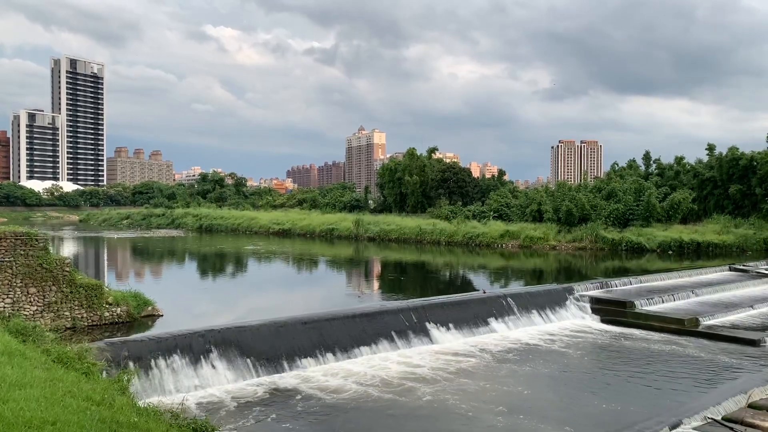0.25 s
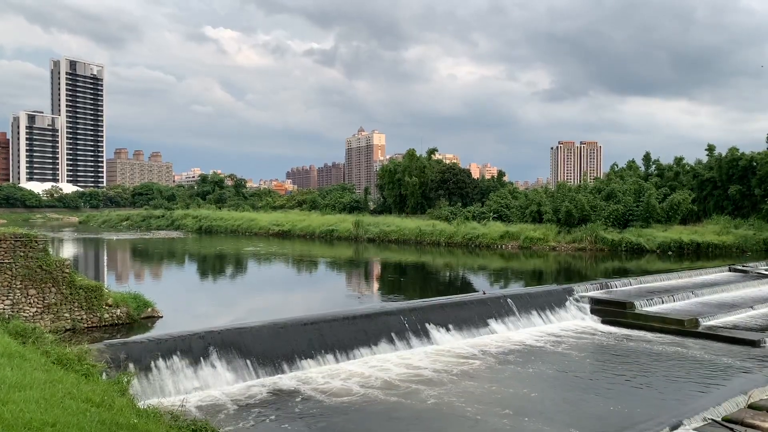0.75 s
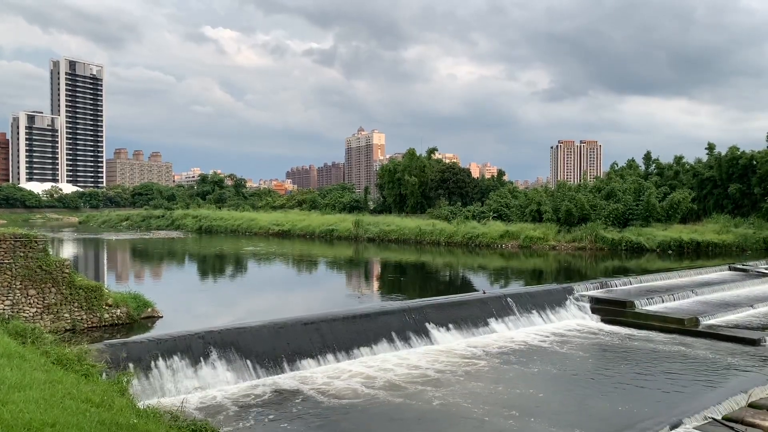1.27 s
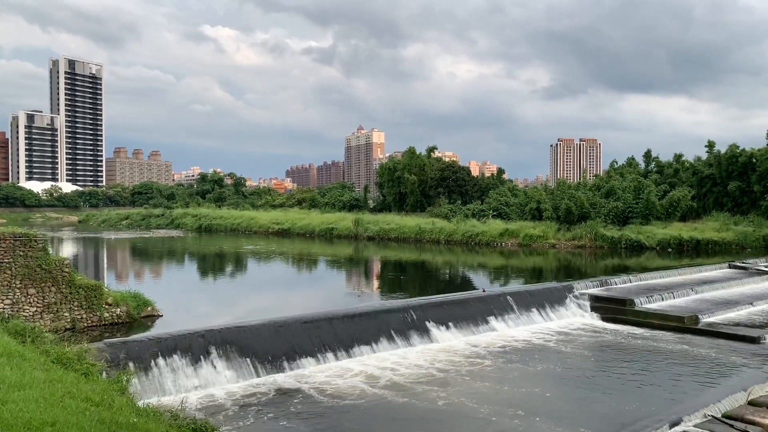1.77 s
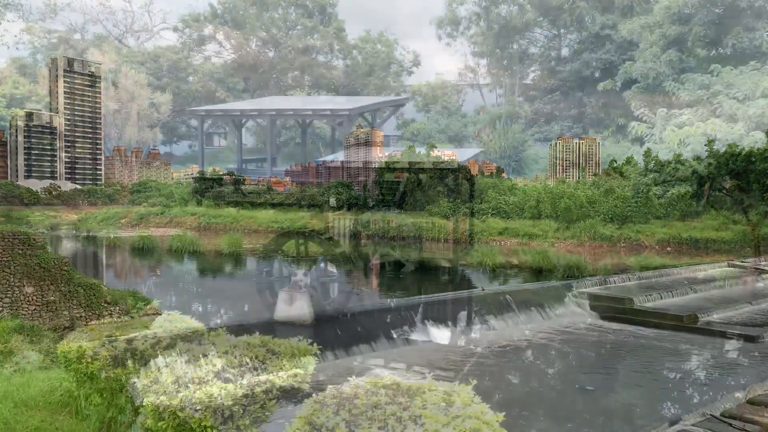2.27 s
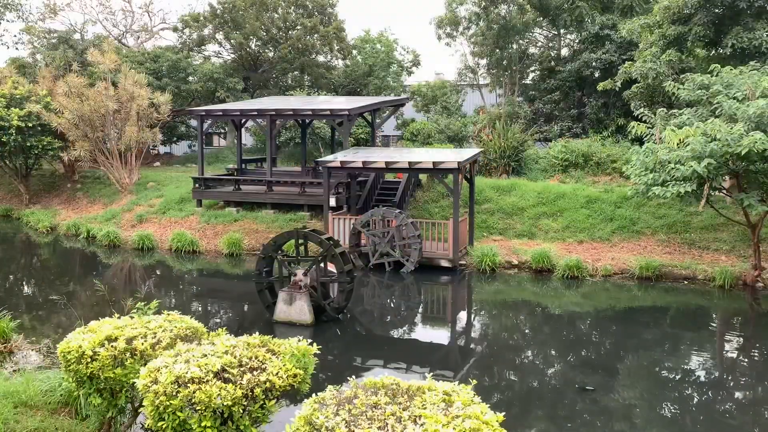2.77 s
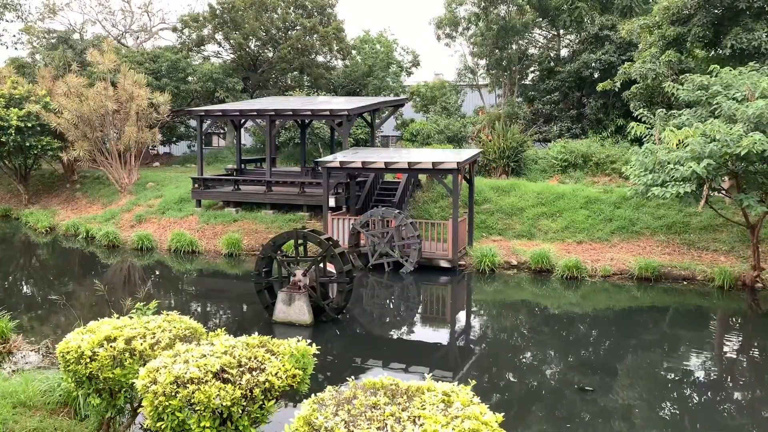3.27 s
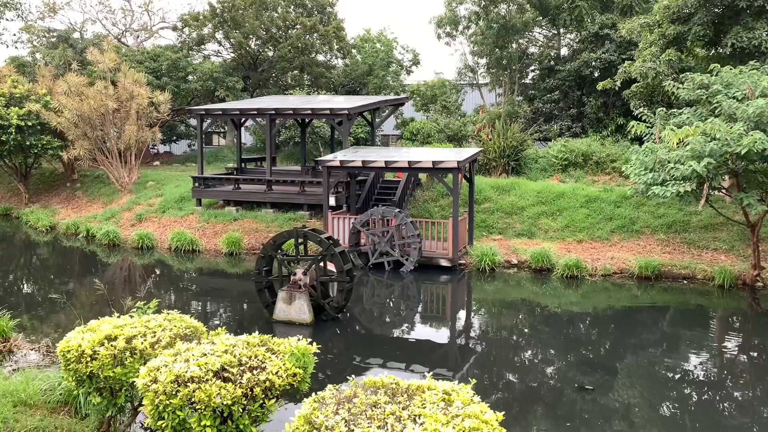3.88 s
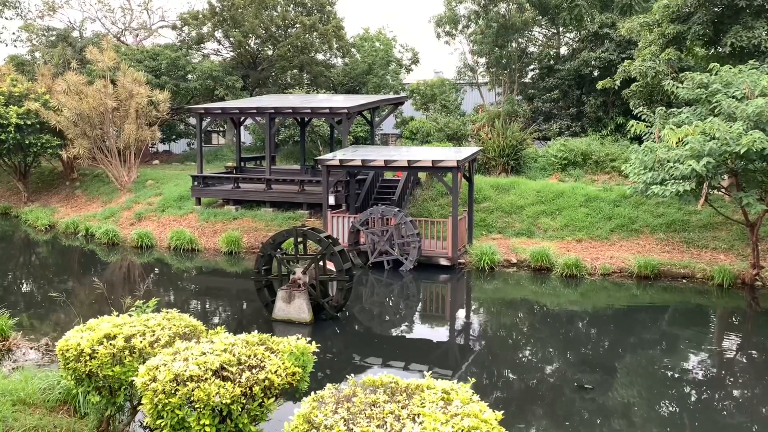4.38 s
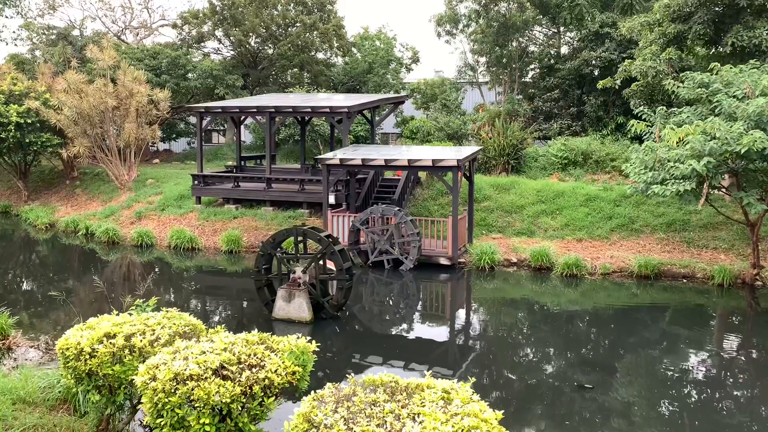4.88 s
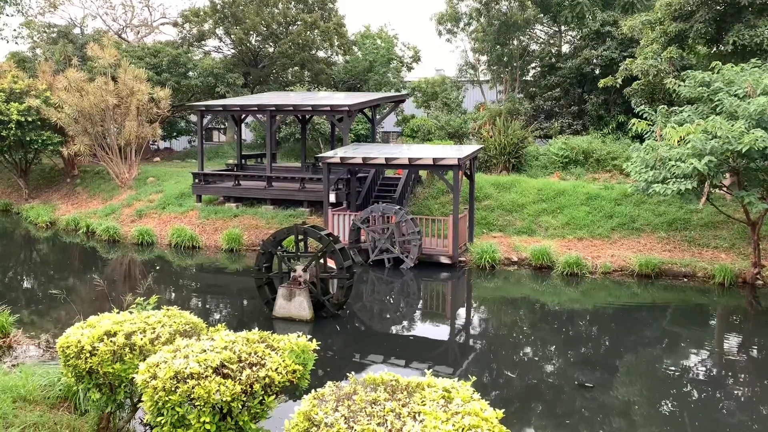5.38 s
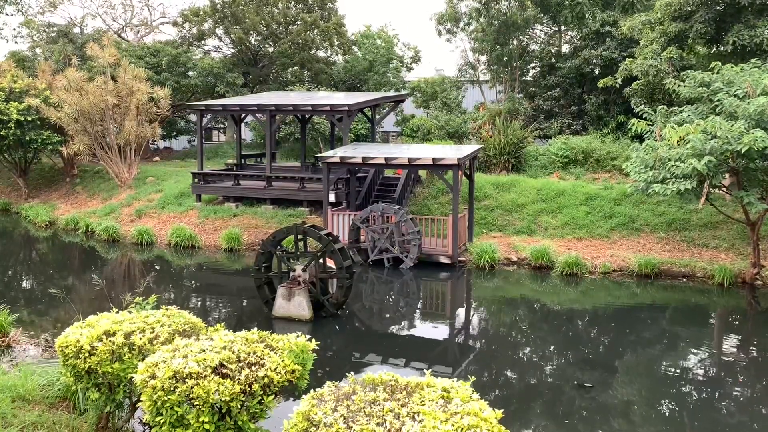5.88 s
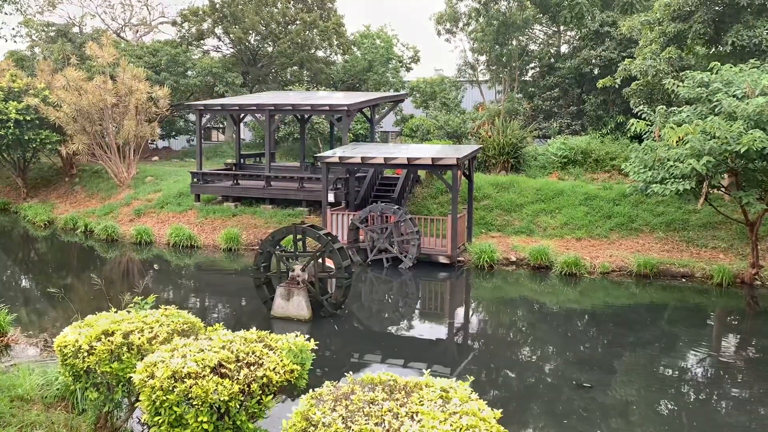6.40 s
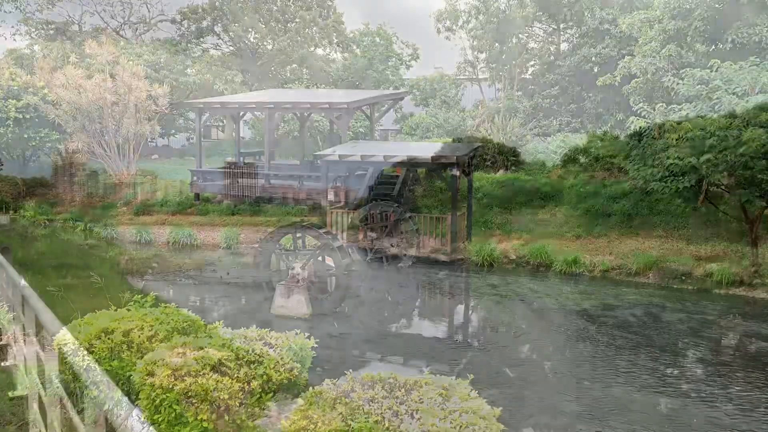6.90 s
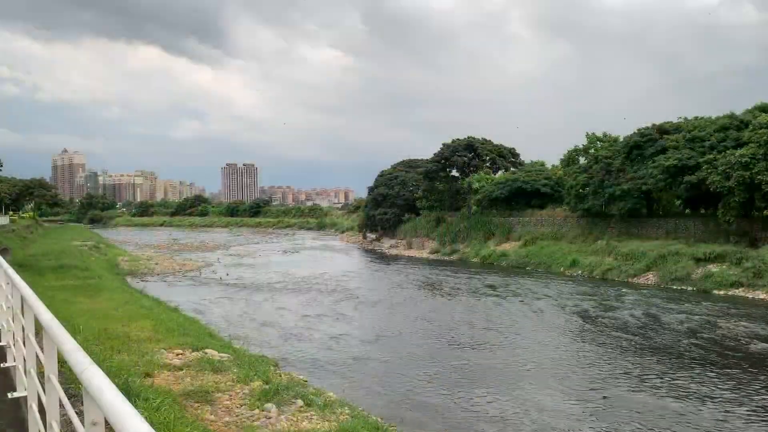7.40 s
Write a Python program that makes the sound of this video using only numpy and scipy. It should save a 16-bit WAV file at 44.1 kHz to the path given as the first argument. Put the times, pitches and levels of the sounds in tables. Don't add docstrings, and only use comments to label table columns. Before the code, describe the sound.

Loud rushing falls of water fade to a hushed pond of faint insects and small bird calls, then distant traffic rumble and a bubbling bird.

```python
import sys
import numpy as np
from scipy import signal
from scipy.io import wavfile
from scipy.ndimage import uniform_filter1d

SR = 44100
rng = np.random.default_rng(int(sys.argv[2]) if len(sys.argv) > 2 else 0)


def output_pcm(signal):
    pcm = np.clip(np.atleast_2d(signal).T, -1, 1) * 32767
    wavfile.write(sys.argv[1], SR, np.round(pcm).astype(np.int16))


def decibels_to_gain(level_db):
    exponent = np.asarray(level_db, float) / 20
    return 10 ** exponent


N = 337365
FRAMES = -(-N // 256) + 1
GRID = 858


def columns(rows, at):
    first, *rest = np.transpose(rows)
    return [np.interp(at, first, c) for c in rest]


def add(mix, start_s, sound):
    part = mix[:, round(start_s * SR):][:, :sound.shape[1]]
    part += sound[:, :part.shape[1]]


def smooth(x, *spans):
    for axis, span in enumerate(spans):
        x = uniform_filter1d(x, max(int(span), 1), axis)
    return x / np.sqrt(np.mean(x ** 2) + 1e-20)


# f/Hz, share of forward sound [0-1], right leads by [radians]
PORT_PATH = [(6500, 0, 0), (7800, 1, 2.1), (8550, 1, 3.14), (11000, 1, 6.28), (13400, 1, 9.42),
             (15700, 1, 12.57)]


def at_ports(z, other, side, aside=0.28, off_axis=0.):
    hz = np.fft.rfftfreq(1024, 1 / SR)
    same, lead, pan_db = columns(side, hz)
    forward, path = columns(PORT_PATH, hz)
    path = path + off_axis * forward
    forward_same = 1 - aside * np.sin(path) ** 2
    same = np.clip(same + forward * (forward_same - same), 0, 1)[:, None]
    wrapped_lead = np.angle(np.exp(1j * lead))
    phase = np.where(forward > 0, path + (1 - forward) * wrapped_lead, lead)
    turn = np.exp(1j * phase)[:, None]
    tilt = decibels_to_gain(pan_db * (1 - forward) / 2)[:, None]
    left = z * tilt
    right = (same * z + np.sqrt(1 - same ** 2) * other) * turn / tilt
    pair = np.array([left, right])
    return pair / np.sqrt((abs(pair) ** 2).sum(axis=1).mean() / 3)


def air(spectrum, side, level_db, patchy_db, swell_db):
    hz = np.fft.rfftfreq(1024, 1 / SR)
    a, b, c, d, patches = rng.standard_normal((FRAMES, 513, 5), dtype="f4").T
    swell = smooth(rng.standard_normal(FRAMES), 30) * np.exp(-hz / 400)[:, None]
    f, db = np.transpose(spectrum)
    colour = np.interp(np.log(hz + 1), np.log(f), db) - 60 * (hz < 20)
    colour -= 6 * np.maximum(hz - 14500, 0) / 1000
    gain = decibels_to_gain(colour[:, None] + patchy_db * smooth(patches, 12, 14) + swell_db * swell)
    return decibels_to_gain(level_db) * at_ports(gain * (a + 1j * b), gain * (c + 1j * d), side)


# f/Hz, left-right likeness [0-1], right leads by [radians], left-right level/dB
WEIR_PLACE = [(100, .985, .1, 0), (300, .97, .2, 0), (500, .62, .2, -1), (750, .65, .4, -4.5),
              (1250, .7, .3, -1.5), (2000, .45, 0, -.5), (2600, .1, 0, -.5), (3300, .35, 1.2, -.5),
              (4000, .12, -.5, -1), (5000, .45, -3, -2), (5700, .15, -4.3, -2), (6500, .68, -6, -1)]
# f/Hz, level/dB
WEIR_COLOUR = [(25, -42), (50, 1), (100, -0.2), (220, 0.0), (330, -4), (450, -8.5), (750, -7), (1300, -10),
               (3000, -13.5), (4200, -17.5), (5500, -20), (8000, -19), (11000, -18.5), (14300, -21.4)]


def weir():
    return air(WEIR_COLOUR, WEIR_PLACE, -26.5, patchy_db=1.06, swell_db=0.1)


# f/Hz, left-right likeness [0-1], right leads by [radians], left-right level/dB
POND_PLACE = [(100, .96, .2, 0), (300, .85, .3, 0), (480, .3, .3, 0), (800, .62, -1.9, 0),
              (1500, .38, -2.6, 0), (2300, .4, -3.1, 0), (3700, .1, -4, 0), (4500, .25, -4, 0),
              (6500, .05, -6, 0)]


def insects(hz, width, rate, level_db, crowd, off_axis):
    drift = smooth(rng.standard_normal(N), 6100)
    turns = np.cumsum(rate * (1 + 0.0302 * drift)) / SR
    buzz = crowd + (1 - crowd) * 2 * np.cos(np.pi * turns) ** 4
    clicks = buzz * rng.standard_normal((2, N), dtype="f4")
    f, _, z = signal.stft(clicks, SR, nperseg=1024, noverlap=768)
    skirt = np.where(f > hz, .48, 1)
    z = z * np.exp(-2 * ((f - hz) / width / skirt) ** 2)[:, None]
    return decibels_to_gain(level_db) / 2 * at_ports(z[0], z[1], POND_PLACE, aside=0.046, off_axis=off_axis)


# f/Hz, level/dB
POND_COLOUR = [(25, -10.5), (50, 2.5), (90, -0.2), (200, -6), (330, -10), (480, -16.5), (1000, -16.5),
               (2000, -23), (3500, -28), (5500, -33.5), (7500, -44), (9000, -46), (12600, -53),
               (13800, -56)]
# f/Hz, width [Hz], buzzes a second [1/s], level/dB,
# share of singers out of step [0-1], off the axis by [radians]
NEAR_CICADA = (10801, 1900, 133, -54, 0.76, 0.13)
TOP_CICADA = (13900, 900, 131, -83, .9, -2)


def pond():
    still = air(POND_COLOUR, POND_PLACE, -41.5, patchy_db=1.13, swell_db=0.5)
    return still + insects(*NEAR_CICADA) + insects(*TOP_CICADA)


# f/Hz, left-right likeness [0-1], right leads by [radians], left-right level/dB
BANK_PLACE = [(100, .95, 0, 0), (500, .75, -.6, 0), (1000, .55, -.9, 0), (1700, .3, 0, 0), (6500, .4, 0, 0)]
# f/Hz, level/dB
BANK_COLOUR = [(25, -12), (50, 2), (90, -4.5), (200, -10.5), (350, -11.5), (600, -18.5), (1100, -22.5),
               (1800, -27.5), (4200, -38), (5500, -47.5), (7300, -52), (9500, -49), (12300, -53),
               (13800, -58.5)]
# f/Hz, width [Hz], buzzes a second [1/s], level/dB,
# share of singers out of step [0-1, above 1 inverts the beat], off the axis by [radians]
THIN_KATYDID = (8550, 500, 111, -71, 4, 0)
DISTANT_CICADA = (10501, 1000, 120.5, -70, 1, -.3)


def bank():
    traffic = air(BANK_COLOUR, BANK_PLACE, -41, patchy_db=1.0, swell_db=1.0)
    return traffic + insects(*THIN_KATYDID) + insects(*DISTANT_CICADA)


# start t/s, length t/s
PLACE_CHANGES = [
    (1.854, 0.97),
    (6.3, 0.95),
]


def backdrops():
    t = np.arange(FRAMES) * 256 / SR
    first, second = (np.clip((t - s) / length, 0, 1) for s, length in PLACE_CHANGES)
    z = (1 - first) * weir()
    z += (first - second) * pond()
    z += second * bank()
    return signal.istft(z, nperseg=1024, noverlap=768)[1][:, :N]


def trees(x, wet_db, t60):
    t = np.arange(SR // 2) / SR
    signs = rng.choice([-1., 1.], (2, len(t)))
    hits = rng.random((2, len(t))) < .05
    taps = signs * hits * decibels_to_gain(-60 * t / t60) * (t > .012)
    taps = taps / np.linalg.norm(taps[0])
    return x + decibels_to_gain(wet_db) * signal.fftconvolve(x, taps, axes=1)[:, :N]


def voice(hz, level_db, rough, pan_db, lead, partials=((1, 0),)):
    flutter = [smooth(smooth(v, 48), 48) for v in rng.standard_normal((2, len(hz)))]
    rough_hz = hz + 430 * rough ** 2 * flutter[0]
    turn = 2 * np.pi * np.cumsum(rough_hz) / SR + lead * np.arange(2)[:, None]
    tone = sum(decibels_to_gain(db) * np.sin(k * turn) for k, db in partials)
    gain = np.sqrt(2) * decibels_to_gain(level_db + np.array([[pan_db], [-pan_db]]) / 2)
    return gain * (1 - rough / 2 + rough * flutter[1]) * tone


def notes(rows, pan_db, lead, rough, glide=0., skew=.69, partials=((1, 0),)):
    out = np.zeros((2, N))
    for s, length, first_hz, *last_hz, db in rows:
        u = np.arange(0, length, 1 / SR) / length
        rise_hz = last_hz[0] - first_hz if last_hz else glide * first_hz
        note = voice(first_hz + rise_hz * u, db, rough, pan_db, lead, partials)
        add(out, s, note * np.sin(np.pi * u ** skew) ** 0.35)
    return out


# t/s after its start, f/Hz, level/dB
PHRASE = [
    (0, 5900, -14),
    (.025, 4650, -2),
    (.048, 5250, -4),
    (.075, 4250, 2),
    (.1, 3960, -2),
    (.118, 4900, -1),
    (.15, 4700, -4),
    (.18, 5000, -5),
    (.235, 4250, -6),
]
# t/s, level/dB, right leads by [radians]
PHRASE_AT = [
    (4.47, -62.5, 1.5),
    (5.9, -61, 1.7),
]


def warbler():
    t = np.arange(0, PHRASE[-1][0], 1 / SR)
    hz, db = columns(PHRASE, t)
    hz = uniform_filter1d(hz, 200)
    out = np.zeros((2, N))
    for s, sung_db, lead in PHRASE_AT:
        add(out, s, voice(hz, db + sung_db, .1, 1, lead) * signal.windows.tukey(len(t), .1))
    return out


# t/s, peak level/dB
SPARROW_CHIRPS = [
    (3.18, -52),
    (3.998, -52.5),
    (4.81, -52.5),
    (5.635, -53.5),
    (6.395, -55),
]
# t/s, top f/Hz, peak level/dB
SPARROW_CHIPS = [
    (3.83, 3900, -63),
    (4.12, 3700, -59),
    (4.97, 5900, -64),
    (5.11, 5100, -59),
    (5.26, 5200, -58),
    (5.37, 3900, -60),
    (6.35, 4600, -59),
    (6.478, 4200, -61),
]
# t/s, peak level/dB
SPARROW_CHURRS = [
    (6.39, -57),
    (6.44, -55),
    (6.53, -59),
]


def sparrows():
    cores = [(s, .045, 4310, db) for s, db in SPARROW_CHIRPS]
    tips = [(s, .02, 5150, db - 8) for s, db in SPARROW_CHIRPS]
    chips = [(s, .03, hz, db) for s, hz, db in SPARROW_CHIPS]
    churrs = [(s, .038, 2700, db) for s, db in SPARROW_CHURRS]
    out = notes(cores, -4, 1.3, rough=.66, glide=-0.0504)
    out += notes(tips, -6, 1.4, rough=.4, glide=-.07)
    out += notes(chips, -4, 1.4, rough=.55, glide=-.26)
    return out + notes(churrs, -3, 1.3, rough=0.79, glide=.2)


# t/s, length t/s, first f/Hz, last f/Hz, peak level/dB
LIQUID_SYLLABLES = [(6.945, 0.053, 3390, 3330, -56.5), (7.0, 0.026, 3300, 2620, -46.5),
                    (7.033, 0.029, 2800, 2850, -49.5), (7.065, .04, 2750, 2750, -62),
                    (7.305, .03, 2590, 2230, -49.5), (7.34, .032, 2330, 2170, -45.5),
                    (7.375, .025, 2200, 2250, -59), (7.476, .016, 2960, 3350, -48),
                    (7.492, .009, 3220, 3150, -53), (7.503, .014, 3150, 2700, -40.5),
                    (7.516, .011, 2800, 2720, -41), (7.53, 0.023, 2600, 2480, -48),
                    (7.553, .016, 2880, 2900, -41), (7.569, 0.01, 2950, 3050, -38),
                    (7.58, 0.015, 2890, 2800, -43), (7.607, .02, 2350, 2300, -56),
                    (7.63, .018, 2390, 2250, -51)]
# t/s, f/Hz, peak level/dB
FAR_TWITTER = [
    (6.88, 3300, -63),
    (6.92, 4150, -68),
    (7.11, 4300, -66),
    (7.19, 4300, -65),
    (7.26, 2800, -64),
]


def bank_birds():
    twitter = [(s, .04, hz, db) for s, hz, db in FAR_TWITTER]
    out = notes(LIQUID_SYLLABLES, -1.2, .3, rough=.13, skew=.45)
    out += notes(twitter, -1.2, .3, rough=.4, glide=-.03)
    whistle_at_s, whistle_s, whistle_hz, arch_hz, whistle_db = 7.0, .31, 3440, 200, -61.5
    u = np.arange(0, whistle_s, 1 / SR) / whistle_s
    hz = whistle_hz - arch_hz * ((u - .25) / .75) ** 2
    strands = voice(hz, whistle_db, .12 + .3 * u ** 2, -1.2, .3, partials=((1, -0.5), (1.065, -8)))
    add(out, whistle_at_s, strands * signal.windows.tukey(len(u), .3))
    return out


# t/s, length t/s, f/Hz, peak level/dB
PIPING = [
    (2.65, 0.094, 1954, -44.5),
    (2.8, 0.098, 1960, -56.5),
    (2.93, .02, 1950, -53),
    (2.935, .045, 2390, -52),
    (2.94, 0.042, 2230, -52),
    (3.02, .034, 2230, -54),
    (3.06, .06, 2280, -62),
    (3.09, .052, 1335, -49),
]


def pipes():
    return notes(PIPING, -2.5, 1.1, rough=.25, glide=-0.011)


# t/s, length t/s, f/Hz, peak level/dB
SQUEAK_OPENING = [
    (3.195, .024, 1375, -55),
]
# multiple of the pitch [1], level/dB
OPENING_STACK = [(2, 5), (3, 0), (4, 1), (5, 1), (6, -12), (7, -3)]
TICK_STACK = [(2, -4), (3, -6), (4, 1.5), (5, -4), (6, -6), (7, -13), (8, -7)]
SQUEAK_STACK = [(1, -22), (2, 0), (3, -23), (4, -29)]
# t/s, length t/s, f/Hz, peak level/dB
SQUEAK_STRANDS = [
    (3.24, .13, 6900, -55.5),
    (3.39, .04, 6950, -59),
    (3.29, .08, 6600, -62),
    (3.4, .06, 6480, -62),
    (3.33, .11, 2890, -52),
    (3.33, .1, 2450, -59),
    (3.51, .09, 2615, -57),
]
# t/s, peak level/dB
TICKS = [
    (2.77, -53.5),
    (3.487, -54),
]


def squeak():
    at_s, length_s, carried_hz, sag_hz, level_db = 3.21, .255, 2688, 85, -43
    attack_s, release_s = .008, .035
    t = np.arange(0, length_s, 1 / SR)
    hz = carried_hz - sag_hz * (t / length_s) ** 2
    shape = np.clip(np.minimum(t / attack_s, (length_s - t) / release_s), 0, 1)
    ticks = [(s, .017, 1112, db) for s, db in TICKS]
    out = notes(SQUEAK_OPENING, -2, .4, rough=.15, glide=-.015, partials=OPENING_STACK)
    out += notes(SQUEAK_STRANDS, -2, 1.2, rough=.33, glide=-.008)
    out += notes(ticks, -4, 0.36, rough=.25, partials=TICK_STACK)
    add(out, at_s, voice(hz / 2, level_db, .12, -3, .5, SQUEAK_STACK) * shape)
    return out


def scene():
    out = backdrops()
    out += trees(sparrows() + warbler(), -3, .5)
    out += trees(bank_birds(), -5, .5)
    return out + trees(pipes() + squeak(), -11, .6)


def treble_gate(x, under_db, floor_db, chance_db, dead_db, from_hz):
    n, k = np.arange(2048), np.arange(1024)
    window = np.sin(np.pi * (n + .5) / 2048)[:, None]
    basis = (window * np.cos(np.pi / 1024 * np.outer(n + 512.5, k + .5))).astype("f4")
    x = x.astype("f4")
    both = np.array([x[0] + x[1], x[0] - x[1]]) / 2
    both = np.pad(both, ((0, 0), (2048 - GRID, 3072)))
    blocks = both[:, :both.shape[1] // 1024 * 1024].reshape(2, -1, 1024)
    lines = np.concatenate([blocks[:, :-1], blocks[:, 1:]], axis=2) @ basis / np.sqrt(512)
    band_db = 10 * np.log10((lines ** 2).reshape(2, -1, 32, 32).mean(axis=3) + 1e-20)
    loudest_db = band_db[:, :, 8:].max(axis=(0, 2))[:, None]
    limit = np.maximum(band_db[::-1] - under_db, floor_db + loudest_db / 4)
    limit = limit + chance_db * rng.standard_normal(band_db.shape)
    band = np.arange(32)
    low_limit = band_db - np.linspace(21, -19, 32) - 20 * (band < 1)
    limit = np.where(band * SR / 64 < from_hz, low_limit, limit)
    keep = band_db > limit
    lines = lines * (abs(lines) > decibels_to_gain(np.repeat(limit, 32, axis=2) + dead_db))
    keep[1, :, 22:] = False
    keep[0, :, 23:] = False
    back = (lines * np.repeat(keep, 32, axis=2)) @ basis.T / np.sqrt(512)
    overlapped = (back[:, 1:, :1024] + back[:, :-1, 1024:]).reshape(2, -1)
    mid, side = overlapped[:, 1024 - GRID:][:, :N]
    return np.array([mid + side, mid - side])


def top_cut(x):
    return signal.sosfilt(signal.butter(12, 16390, fs=SR, output="sos"), x)


def record(dry):
    rumble_filter = signal.butter(4, 42, "high", fs=SR, output="sos")
    filtered = signal.sosfilt(rumble_filter, dry)
    limited = signal.oaconvolve(filtered, signal.firwin(127, 15700, fs=SR)[None], "same")
    mix = treble_gate(limited, under_db=6, floor_db=-58.5, chance_db=2, dead_db=-.5, from_hz=5500)
    return top_cut(mix)


dry = scene()
out = record(dry)
output_pcm(out)
```